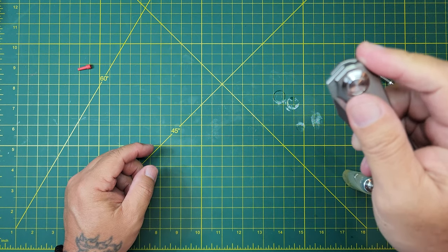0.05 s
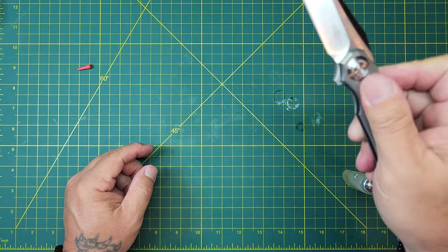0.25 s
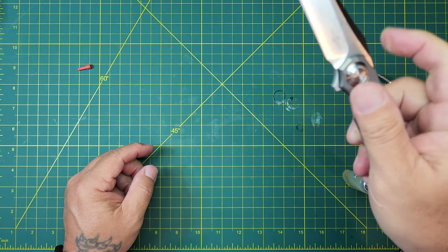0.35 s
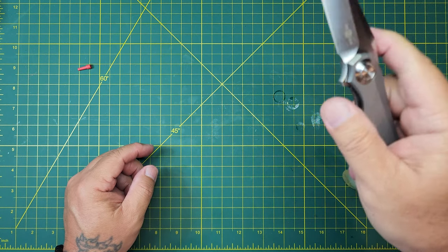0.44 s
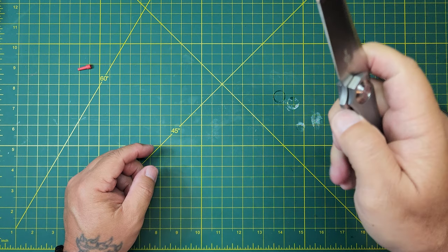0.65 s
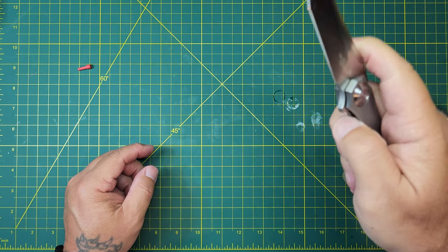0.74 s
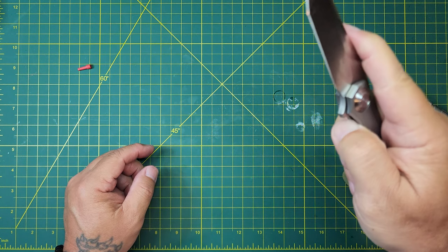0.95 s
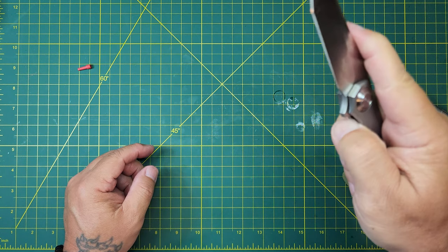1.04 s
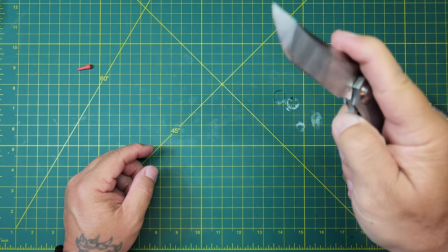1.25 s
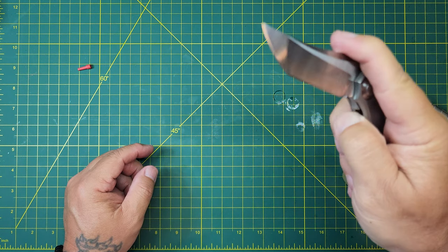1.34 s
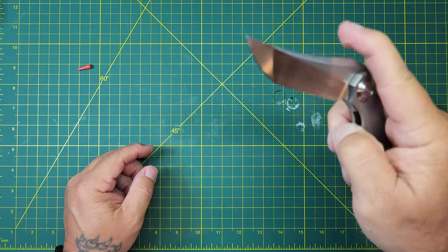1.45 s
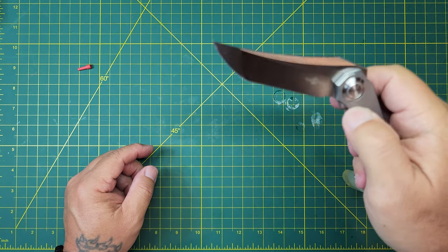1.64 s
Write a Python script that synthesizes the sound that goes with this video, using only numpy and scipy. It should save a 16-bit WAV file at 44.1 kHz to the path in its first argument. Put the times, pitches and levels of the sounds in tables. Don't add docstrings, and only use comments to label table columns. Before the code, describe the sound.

A folding knife is flicked open close to the microphones: a tiny tick, a quick rising scrape, a loud bright metallic snap that rings briefly, then a softer lock-release click, in a small room with faint low hum.

```python
import sys
import numpy as np
from scipy import signal
from scipy.fft import rfft, irfft
from scipy.io import wavfile
from scipy.ndimage import uniform_filter1d

SR = 44100
rng = np.random.default_rng(int(sys.argv[2]) if len(sys.argv) > 2 else 0)


def convert_level_to_amplitude(level_db):
    exponent = np.asarray(level_db, float) / 20
    return 10 ** exponent


def store_pcm(level_fs):
    pcm = np.round(np.clip(level_fs, -1, 1) * 32767).astype(np.int16)
    wavfile.write(sys.argv[1], SR, np.atleast_2d(pcm).T)


N = 74970


def unit(x):
    return x / np.sqrt(np.mean(x ** 2))


def noise_pair():
    return rng.standard_normal((2, N))


def shape(x, gain):
    size = x.shape[-1]
    hz = np.arange(size // 2 + 1) * SR / size + 1
    return irfft(rfft(x) * gain(hz), size)


def curve(table, hz, column=1):
    table = np.array(table)
    return np.interp(np.log(hz), np.log(table[:, 0]), table[:, column])


def peak(hz, width):
    return lambda f: 1 / np.sqrt(1 + ((f - hz * hz / f) / width) ** 2)


def fade(t, t60, rise=1e-5):
    u = np.maximum(t, 0)
    return (1 - np.exp(-(u / rise) ** 2)) * convert_level_to_amplitude(-60 * u / t60)


def sweep(t, times, pitches):
    return 2 * np.pi * np.cumsum(np.interp(t, times, pitches)) / SR


def walk(rate):
    k = int(SR / rate)
    return unit(uniform_filter1d(uniform_filter1d(rng.standard_normal(N), k), k))


# frequency in Hz, level in dB per Hz.
AIR_COLOUR = [(88, -27), (150, -7), (172, -22.5), (254, -9), (354, -31), (745, -26), (1360, -32),
              (3490, -38), (16000, -57)]


def air():
    alike_under_hz, level_db = 420, -70.5
    mid, side = noise_pair()
    side = shape(side, lambda f: np.clip(f / alike_under_hz / 2, .1, 1))
    both = np.array([mid + side, mid - side])
    return convert_level_to_amplitude(level_db) * unit(shape(both, lambda f: convert_level_to_amplitude(curve(AIR_COLOUR, f)) * (f > 20)))


# frequency in Hz, width in Hz, level in dB.
RUMBLE_BANDS = [(28, 8, -68), (60, 74, -65), (90, 20, -65), (110.43, 8, -67), (128.1, 18, -68)]
# time in seconds, pitch in Hz, level in dB.
MOTOR_PATH = [(0.0, 55.17, -51.5), (0.088, 55.88, -48), (0.306, 54.29, -54.5), (0.396, 54.84, -51),
              (0.41, 54.16, -58.5), (0.558, 54.7, -52), (0.644, 54.72, -69), (0.814, 54.68, -51),
              (0.86, 54.4, -71), (0.89, 54.2, -51), (1.136, 54.67, -56.5), (1.24, 54.2, -47.5),
              (1.278, 54.4, -71), (1.302, 54.93, -54), (1.67, 54.74, -56), (1.7, 54.2, -61.5)]
# frequency in Hz, level in dB, phase in radians.
HUM_LINES = [(233.6, -70, 0.3), (240.15, -71, -4.6), (7950, -98, .3)]


def appliance(t):
    out = 0
    for hz, width, db in RUMBLE_BANDS:
        mid, side = shape(shape(noise_pair(), peak(hz, width)), peak(hz, 3 * width))
        out = out + convert_level_to_amplitude(db) * unit(np.array([mid + .17 * side, mid - .17 * side]))

    s, hz, db = np.array(MOTOR_PATH).T
    lead = np.array([[.12], [-.12]])
    out = out + np.sqrt(2) * convert_level_to_amplitude(np.interp(t, s, db)) * np.sin(sweep(t, s, hz) + lead)

    for hz, db, phase in HUM_LINES:
        lead = min(.4 * hz / 240, 1)
        pan_db = 2 * lead
        left = convert_level_to_amplitude(pan_db) * np.sin(2 * np.pi * hz * t + phase + lead)
        right = convert_level_to_amplitude(-pan_db) * np.sin(2 * np.pi * hz * t + phase - lead)
        out = out + np.sqrt(2) * convert_level_to_amplitude(db + 0.74 * walk(5)) * np.array([left, right])
    return out


# time in seconds, level in dB, pitch of the pivot's resonance in Hz.
SWING_PATH = [
    (.145, -83, 3000),
    (0.157, -65.5, 3200),
    (.168, -55.5, 3570),
    (.178, -51, 5020),
    (.19, -52, 5000),
    (.204, -48.5, 5140),
    (.208, -84.5, 5050),
]


def swing(t):
    s, db, hz = np.array(SWING_PATH).T
    rough = unit(shape(noise_pair(), lambda f: 1 / (1 + (f / 300) ** 2)))
    tone = rough * np.sin(sweep(t, s, hz))
    wide = unit(shape(noise_pair(), peak(7700, 13000)))
    top = unit(shape(noise_pair(), peak(14900, 900)))
    scrape = tone + convert_level_to_amplitude(3) * wide + convert_level_to_amplitude(-5) * top
    level = convert_level_to_amplitude(np.interp(t, s, db, -150, -150) + 1.9 * walk(300))
    squeal_level = convert_level_to_amplitude(-40) * np.clip((t - .186) / 0.013, 0, 1) * (t < .206)
    return level * scrape + squeal_level * np.sin(2 * np.pi * 3700 * t)


# start in seconds, level in dB, pitch in Hz, time to fall 60 dB in seconds.
LIGHT_TICKS = [(0.152, -53.5, 2116, .04), (.166, -56, 8200, .02), (0.21, -44.5, 76.6, 0.21),
               (0.209, -48, 128.2, 0.092), (0.215, -72, 4793, 1.2), (.298, -62, 382.5, 0.25),
               (1.0588, -69, 3040, 0.031), (1.1179, -44, 2030, 0.034), (1.298, -56, 1301, 0.031),
               (1.327, -54, 1425, .03), (1.361, -66, 2814, 0.031)]


def ticks(t):
    out = np.zeros((2, N))
    for s, db, hz, t60 in LIGHT_TICKS:
        out += convert_level_to_amplitude(db) * fade(t - s, t60, 1.2 / hz) * np.sin(2 * np.pi * hz * (t - s))
    return out


def strikes(t, hits, modes, crack):
    contact_s, crack_t60_s = 0.00027, 0.0099
    out = np.zeros((2, N))
    hz, db, t60 = np.array(modes).T[:, :, None]
    for s, hit_db, pan_db, crack_db in hits:
        i = int(s * SR)
        u = t[i:] - s
        luck = rng.standard_normal((3, len(modes), 1))
        noise = unit(shape(noise_pair(), lambda f: convert_level_to_amplitude(curve(crack, f))))[:, i:]
        for c in range(2):
            wave = np.sin(2 * np.pi * hz * u + c * 1.5 * luck[2])
            ring = convert_level_to_amplitude(db + 2.7 * luck[c]) * fade(u, t60, contact_s) * wave
            snap = convert_level_to_amplitude(crack_db - 4.5) * noise[c] * fade(u, crack_t60_s, contact_s)
            out[c, i:] += convert_level_to_amplitude(hit_db + pan_db * (1.5 - c)) * (0.32 * ring.sum(0) + snap)
    return out


# start in seconds, level in dB, left over right in dB, share of crack in dB.
LOCK_BLOWS = [
    (.2061, -12.5, -2, 6),
    (0.2062, -23, 2, 2),
    (0.2088, -14.5, 0, 1),
    (0.2106, -8.5, -1, 13.5),
    (0.2119, -11.5, -3.5, 2.5),
    (0.2147, -15.5, 0, -1.5),
]
# pitch in Hz, level in dB, time to fall 60 dB in seconds.
OPEN_RINGING = [(1816, -27.5, 0.017), (2225.6, -12, 0.076), (2277, -7.5, 0.068), (3490, -5.5, 0.049),
                (3915, -5, .02), (3975, -5, 0.034), (4544, -3, 0.0255), (4770, 0.5, .03), (5490, -8, .015),
                (6141, -8.5, 0.0092), (7810, -7.5, 0.033), (8130, -5.5, .015), (10195, -12.5, 0.0084),
                (12890, -12, .01)]
# frequency in Hz, level in dB per Hz.
LOCK_CRACK_COLOUR = [(59, -55), (100, -26.5), (1330, -28), (2220, -6.5), (2800, -21.5), (4670, -3.5),
                     (5420, -15), (6020, -8), (16000, -18)]


def lock_up(t):
    return strikes(t, LOCK_BLOWS, OPEN_RINGING, LOCK_CRACK_COLOUR)


# frequency in Hz, time to fall 60 dB in seconds, level in dB.
ROOM_DECAY = [(100, .3, -24.5), (500, 0.8, -21), (1400, 0.26, -23.5), (2311, .4, -23), (4706, 0.5, -25),
              (7800, 0.38, -21), (11996, 0.25, -20), (15930, 0.26, -18.5)]


def room(t, x):
    gap_s, likeness = 0.0074, 0.4
    noise = rng.standard_normal((3, N))
    noise = np.sqrt(likeness) * noise[2] + np.sqrt(1 - likeness) * noise[:2]
    tail = 0
    for hz in 80 * 2 ** (np.arange(24) / 3):
        band = shape(noise, lambda f: np.maximum(1 - 3 * np.abs(np.log2(f / hz)), 0))
        level = convert_level_to_amplitude(curve(ROOM_DECAY, hz, column=2) - 16.5)
        tail = tail + level * fade(t, curve(ROOM_DECAY, hz)) * band
    tail = tail * np.clip(t / gap_s, 0, 1) ** 2
    return signal.fftconvolve(x, tail, axes=1)[:, :N]


# start in seconds, length in seconds.
SLIDE_TIMES = [(.57, .09), (.59, .07), (.5, .19), (1.61, .09), (1.108, .025), (1.108, .025), (.22, .12),
               (.45, .44), (.68, .27), (.69, .25), (.76, .17), (1.15, .5), (1.16, .4), (1.2, .35)]
# level in dB, centre in Hz, width in Hz.
SLIDE_SOUNDS = [(-73.5, 2900, 260), (-73.5, 3530, 230), (-74, 5800, 7000), (-71, 6600, 5800),
                (-59, 2400, 1500), (-63, 6100, 12000), (-58, 410, 740), (-74.5, 4800, 150),
                (-73, 1350, 220), (-78.5, 1700, 120), (-80.5, 3050, 200), (-71, 1405, 200), (-79, 1700, 79),
                (-79, 660, 200)]


def rubs(t):
    out = 0
    for (s, length), (db, hz, width) in zip(SLIDE_TIMES, SLIDE_SOUNDS):
        noise = shape(shape(noise_pair(), peak(hz, width)), peak(hz, 2 * width))
        swell = np.sin(np.pi * np.clip((t - s) / length, 0, 1)) ** 1.5
        out = out + convert_level_to_amplitude(db + 1.0 * walk(120)) * unit(noise) * swell
    return out


# start in seconds, level in dB, left over right in dB, share of crack in dB.
FREE_BLOWS = [
    (1.112, -55, 0, -15),
    (1.119, -44, 7, -17.5),
    (1.1324, -24.5, -7, 6),
    (1.1340, -29.5, 8.5, -7),
    (1.1471, -52.5, 14.5, -10),
]
# pitch in Hz, level in dB, time to fall 60 dB in seconds.
HELD_RINGING = [(1965, -17.5, 0.017), (2443, -2, 0.015), (2970, -14.5, 0.036), (4467, -5, 0.0092),
                (4730, -2.5, 0.019), (5784, -11.5, 0.019), (7980, -13, 0.0071), (10140, -33, 0.012)]
# frequency in Hz, level in dB per Hz.
FREE_CRACK_COLOUR = [(350, -72), (600, -55), (1510, -53), (2570, -4), (4650, -2), (5260, -9.5),
                     (16000, -41)]


def release(t):
    return strikes(t, FREE_BLOWS, HELD_RINGING, FREE_CRACK_COLOUR)


def scene():
    t = np.arange(N) / SR
    knife = lock_up(t) + release(t) + ticks(t) + swing(t)
    return knife + room(t, knife) + rubs(t) + air() + appliance(t)


def top_cut(x):
    return signal.sosfilt(signal.butter(12, 16860, fs=SR, output="sos"), x)


def record(dry):
    mix = shape(dry, lambda f: 1 / (1 + (f / 16000) ** 120))
    return top_cut(mix)


dry = scene()
out = record(dry)
store_pcm(out)
```